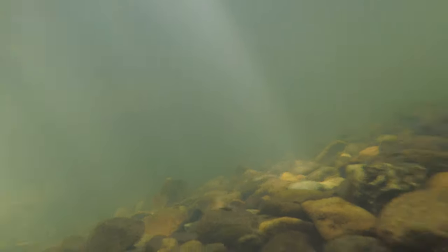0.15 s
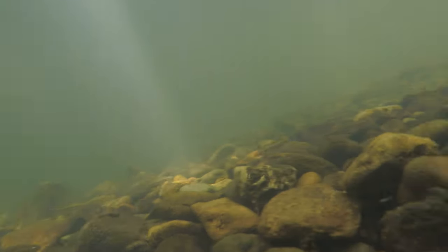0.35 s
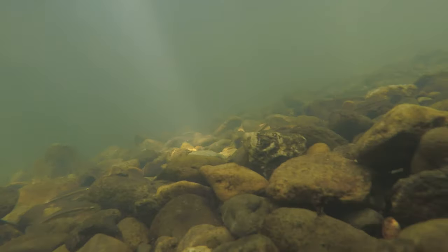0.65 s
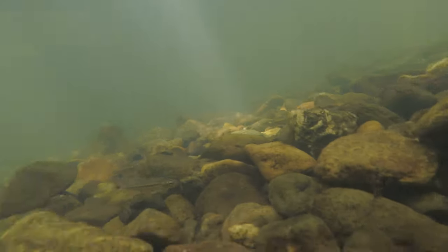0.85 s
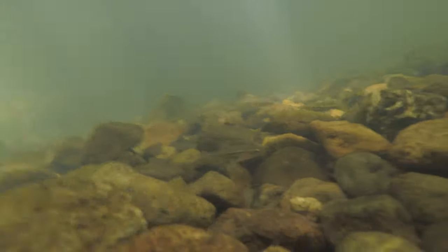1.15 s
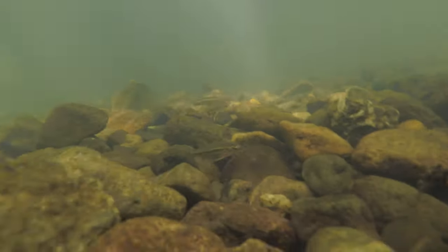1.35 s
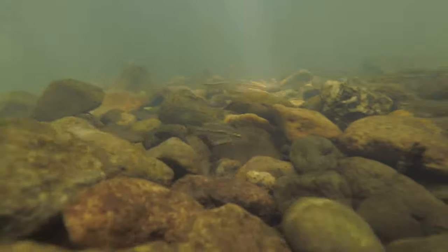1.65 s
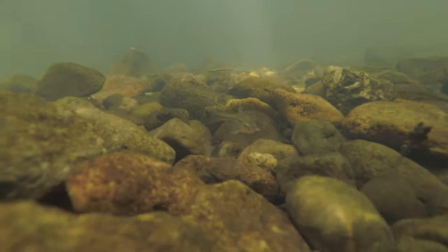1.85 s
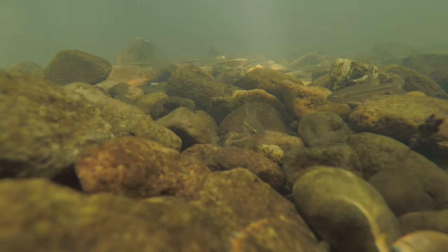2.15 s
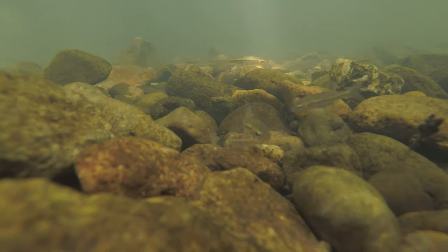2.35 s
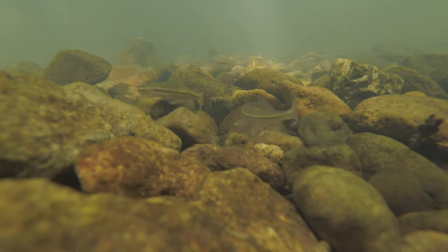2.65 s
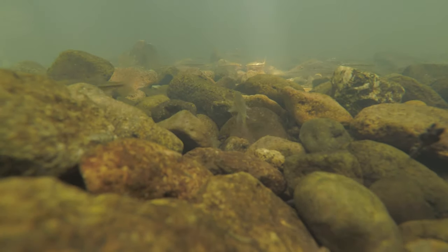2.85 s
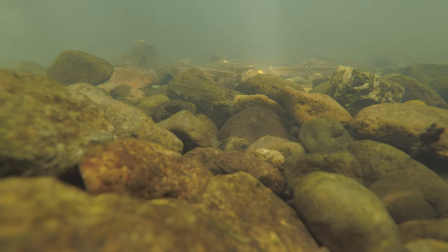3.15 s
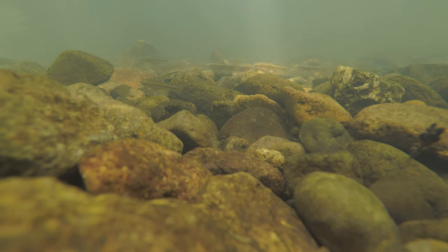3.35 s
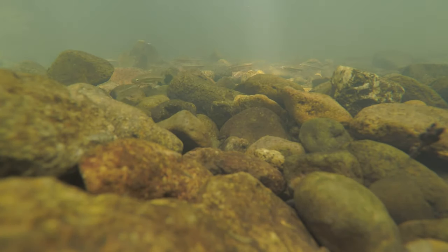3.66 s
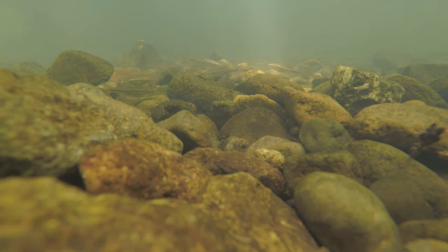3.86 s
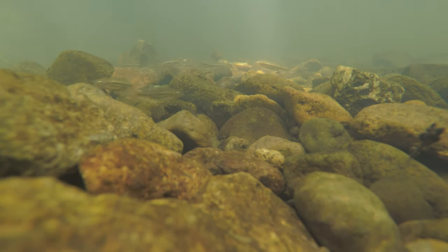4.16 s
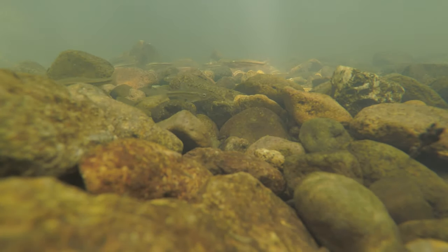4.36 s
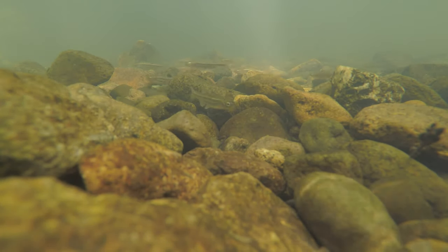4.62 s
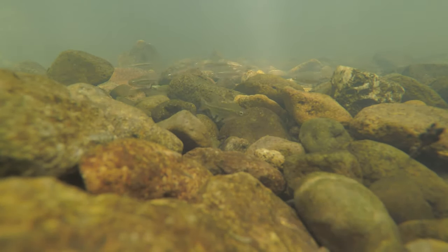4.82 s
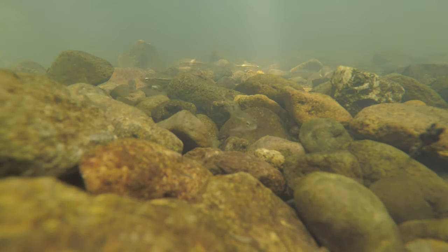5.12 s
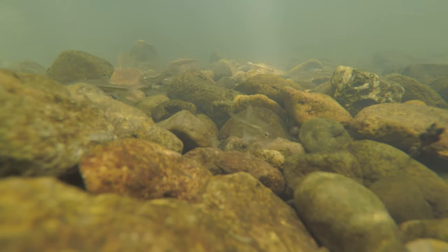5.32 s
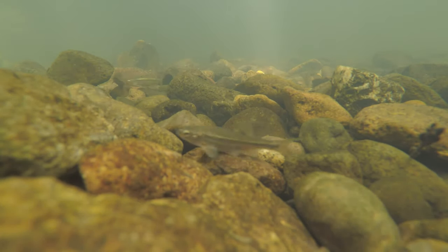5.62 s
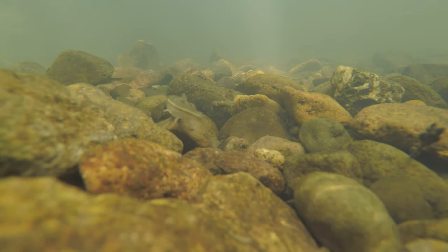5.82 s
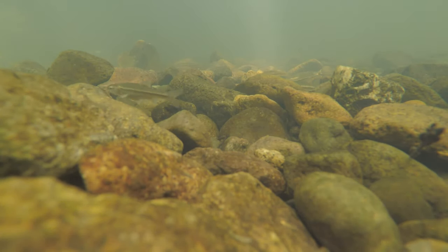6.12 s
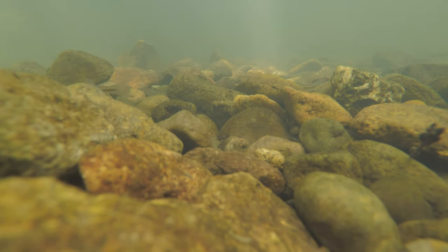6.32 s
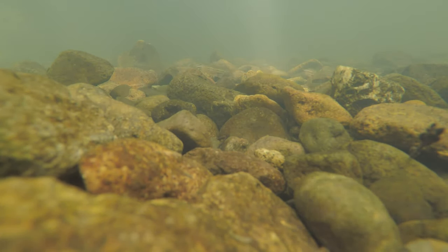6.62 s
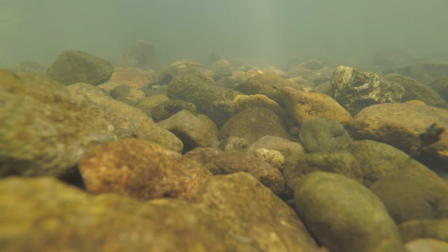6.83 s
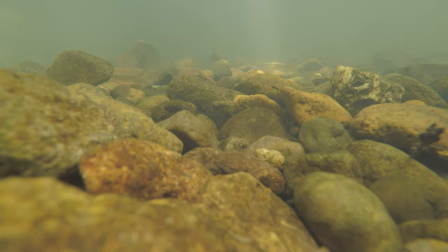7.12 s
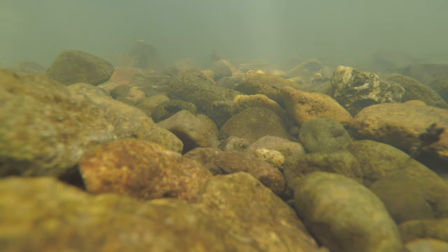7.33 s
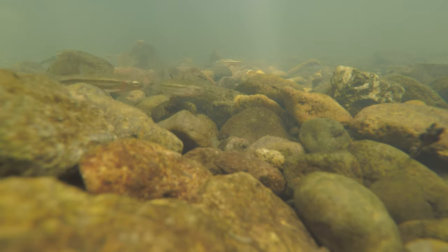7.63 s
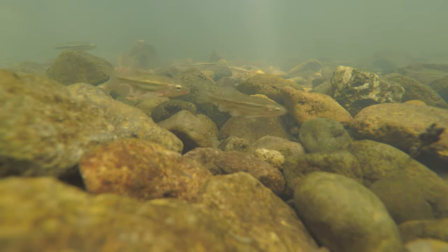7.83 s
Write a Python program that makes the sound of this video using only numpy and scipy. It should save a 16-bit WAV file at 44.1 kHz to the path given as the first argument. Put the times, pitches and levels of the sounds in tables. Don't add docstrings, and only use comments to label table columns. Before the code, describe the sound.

Hollow plastic knocks and gritty scrapes on creek stones, a brief hush, then dull rumbling water flow with small bubble ticks and plinks.

```python
import sys
import numpy as np
from scipy import signal
from scipy.fft import rfft, irfft, next_fast_len
from scipy.io import wavfile
from scipy.ndimage import uniform_filter1d

SR = 44100
rng = np.random.default_rng(int(sys.argv[2]) if len(sys.argv) > 2 else 0)


def volts(x):
    e = np.asarray(x, float) / 20
    return 10 ** e


def log_audio(samples):
    frames = np.atleast_2d(samples).T
    limited = np.clip(frames, -1, 1)
    pcm = np.round(limited * 32767).astype(np.int16)
    wavfile.write(sys.argv[1], SR, pcm)


N = 351918

# f/Hz, width/Hz, level/dB
HOUSING_MODES = [(1230, 310, 2.5), (1630, 420, 0), (2310, 270, -10), (3430, 470, -25), (4970, 330, -38)]
# t/s, level/dB
GAIN_NOISE = [
    (0, -93.5),
    (2.15, -99.5),
    (2.9, -84.5),
    (3.4, -80.5),
    (3.9, -77),
    (4.9, -74),
    (5.6, -75.5),
    (7.98, -72),
]


def rms_one(x):
    return x / np.sqrt(np.mean(x ** 2) + 1e-20)


def in_time(rows):
    s, *columns = np.transpose(rows)
    return [np.interp(np.arange(N) / SR, s, c) for c in columns]


def drift(rate):
    r = np.exp(-80 * np.pi * rate / SR)
    slow = signal.lfilter([1], [1, -2 * r, r * r], rng.standard_normal(N // 40 + 2002))[2000:]
    return np.interp(np.arange(N) / 40, np.arange(len(slow)), rms_one(slow))


def colour(x, hz, level_db, lead_rad=None):
    size = next_fast_len(N + 4096) * 2
    grid = np.log(np.fft.rfftfreq(size, 1 / SR) + 1)
    log_hz = np.log(hz)
    shape_db = np.interp(grid, log_hz, level_db)
    if lead_rad is not None:
        turn = np.exp(1j * np.interp(grid, log_hz, lead_rad))
        return irfft(rfft(x, size) * volts(shape_db) * turn, size)[:N]
    shape_db -= 25 * (np.maximum(log_hz[0] - grid, 0) + np.maximum(grid - log_hz[-1], 0))
    cepstrum = irfft(np.log(rms_one(volts(shape_db))), size)
    cepstrum[1:size // 2] *= 2
    cepstrum[size // 2 + 1:] = 0
    return irfft(rfft(x, size) * np.exp(rfft(cepstrum)), size)[:N]


def band(x, low_hz, high_hz):
    return signal.sosfilt(signal.butter(2, [low_hz, high_hz], "band", fs=SR, output="sos"), x)


def low_pass(x, hz):
    return signal.sosfilt(signal.butter(4, hz, fs=SR, output="sos"), x)


def high_pass(x, hz, order):
    return signal.sosfilt(signal.butter(order, hz, "high", fs=SR, output="sos"), x)


def add(out, at_s, piece):
    i = max(round(at_s * SR), 0)
    out[i:i + len(piece)] += piece[:N - i]


def ping(level_db, hz, t60_s, glide, onset):
    t = np.arange(int(SR * .25)) / SR
    envelope = volts(-60 * t / max(t60_s, .002)) * (1 - np.exp(-t * hz * onset))
    warped = t + glide * t * np.minimum(t / t60_s, 1)
    return volts(level_db) * envelope * np.sin(2 * np.pi * hz * warped)


def grit(per_s, spread_db, smooth):
    sizes = volts(spread_db * np.minimum(rng.exponential(1, N), 5)) * rng.choice([-1, 1], N)
    born = rng.random(N) < per_s * volts(4.0 * drift(25)) / SR
    return rms_one(rms_one(sizes * born) + smooth * rng.standard_normal(N))


def resonate(forces, modes):
    out = 0
    for k, (x, (hz, width_hz, level_db)) in enumerate(zip(forces, modes)):
        r = np.exp(-np.pi * width_hz / SR)
        rung = signal.lfilter([1 - r * r, 0, r * r - 1], [1, -2 * r * np.cos(2 * np.pi * hz / SR), r * r], x)
        out = out + (-1) ** k * volts(level_db) * rung
    return low_pass(out, 5700)


def knocks():
    # t/s, peak/dB, ring f/Hz, grind/dB, lead-in/share of contact
    lowering = [(0.155, -24, 720, -51, 0.57), (.182, -31, 946, -63, .5), (0.201, -22.5, 784, -52.5, .5),
                (.2185, -27.5, 914, -36.5, 0.39), (0.231, -18, 695, -54, 0.91),
                (0.246, -22.5, 888, -66, .2), (0.263, -18.5, 780, -49, .7), (0.302, -18, 793, -42, 0.31),
                (0.328, -14, 750, -44.5, .6), (0.339, -13.5, 726, -33.5, 0.36),
                (.36, -23.5, 720, -63, 0.41), (.391, -12, 605, -36.5, 0.27), (0.403, -11.5, 559, -45, 1),
                (0.464, -14.5, 825, -28.5, 0.55), (.483, -10.5, 768, -30, 0.43),
                (0.491, -12.5, 744, -20, 0.53), (0.527, -16, 620, -34.5, 0.66),
                (0.561, -24.5, 653, -68, 0.32), (0.619, -38, 580, -62, 0.64), (0.693, -26, 688, -55.5, 1),
                (0.751, -28, 750, -68, 0.52), (0.786, -33, 720, -59, 0.4)]
    # t/s, peak/dB, ring f/Hz, grind/dB, lead-in/share of contact
    seating = [(0.97, -18, 1235, -44.5, 0.28), (0.977, -14, 860, -39.5, 0.4), (.998, -11.5, 683, -62, 1),
               (1.142, -18.5, 773, -56, 1), (1.164, -26, 780, -59, 0.24), (1.187, -23, 777, -58, 0.25),
               (1.242, -11, 536, -49, 1), (1.299, -10, 907, -27, 0.14), (1.329, -9, 698, -25.5, 0.48),
               (1.41, -16, 526, -76, 0.3), (1.472, -15, 687, -78.5, 0.12), (1.537, -10, 774, -45, 0.23),
               (1.556, -25, 868, -46, 0.48), (1.57, -9.5, 1148, -26, 0.62), (1.604, -24.5, 716, -54, .5),
               (1.669, -33, 830, -73, 0.34), (1.715, -26.5, 814, -71.5, 0.62), (1.736, -17, 863, -51, 0.53),
               (1.748, -11, 651, -56, 0.58), (1.787, -29.5, 920, -55.5, 0.48), (1.799, -14.5, 612, -60, .5),
               (1.811, -16.5, 830, -39, 0.37), (1.897, -30.5, 720, -69.5, 1),
               (1.932, -39, 604, -58.5, 0.52), (1.962, -27.5, 1096, -35, 1), (1.97, -14, 807, -37, .1),
               (1.982, -11, 620, -49.5, .1), (2.035, -17.5, 785, -46, 0.11)]
    # t/s, peak/dB, ring f/Hz
    nudges = [(2.12, -47, 840), (2.16, -65.5, 910), (2.29, -47.5, 692), (2.547, -53, 694),
              (2.58, -54, 1010), (2.9, -47, 686), (2.978, -37.5, 920), (2.564, -45.5, 860),
              (2.625, -47.5, 910), (2.725, -41, 644), (2.777, -31.5, 766), (2.85, -12.5, 400),
              (3.006, -29, 462), (3.057, -26.5, 814), (3.068, -20.5, 477), (3.225, -37, 460),
              (3.295, -40, 327), (3.33, -41, 328), (3.376, -33, 310), (3.512, -31, 520),
              (3.611, -28.5, 540), (3.645, -26, 326), (3.767, -30, 557), (3.901, -19, 520),
              (3.928, -28.5, 590), (3.951, -28.5, 895), (3.468, -45, 700), (3.588, -37, 900),
              (3.678, -37, 900), (3.724, -33, 655), (3.862, -30, 330), (7.328, -31, 980), (7.341, -27, 855),
              (4.043, -26, 520), (4.129, -27.5, 760), (4.217, -31.5, 557), (4.343, -34, 626),
              (4.388, -21.5, 567), (4.422, -25, 540), (4.483, -34, 840), (4.54, -22, 570), (4.63, -20, 610),
              (5.034, -24.5, 670), (5.18, -21.5, 780), (5.201, -13, 810), (5.543, -23, 530)]
    nudge_grind_db, grind_per_db, nudge_lead = -63, .8, 0.62
    contact_s, longer_per_db = 0.0074, 0.05
    reference_db = -26.0

    contacts = lowering + seating
    for s, db, hz in nudges:
        contacts = contacts + [(s, db, hz, nudge_grind_db + grind_per_db * (db - reference_db), nudge_lead)]
    body, rasps = np.zeros(N), np.zeros((len(HOUSING_MODES), N))
    favour_db = 1.3 * rng.standard_normal((len(contacts), len(HOUSING_MODES)))
    t = np.arange(-2205, 3969) / SR
    touch = np.arange(len(t)) == 2300
    noises = rng.standard_normal((len(contacts), len(t)))
    for (s, level_db, hz, grind_db, lead), noise, favours in zip(contacts, noises, favour_db):
        after_s = t - .003
        length_s = contact_s * volts(longer_per_db * (level_db - reference_db))
        rise_s = 0.00039 + max(lead, 0) * length_s
        fall_s = length_s * (0.5 + 0.43 * max(lead, 0))
        envelope = np.exp(np.where(after_s < 0, after_s / rise_s, -after_s / fall_s))
        bite = rms_one(noise * envelope) * 0.033 + touch * 0.96
        rung = band(bite, hz * 0.832, hz * 1.148)
        rung = rung + 0.32 * band(bite, 430, 830) - 0.18 * band(bite, 640, 1124)
        add(body, s + t[0], volts(level_db) * rung / np.abs(rung).max())
        for rasp, lift_db in zip(rasps, favours):
            add(rasp, s + t[0], volts(grind_db + lift_db + 6.5) * noise[::-1] * envelope ** 1.6)
    return low_pass(body, 1350) + resonate(rasps + 1e-18, HOUSING_MODES)


def thumps():
    # t/s, peak/dB, f/Hz, t60/s
    pushes = [(0.265, -31.5, 128.4, 0.3), (0.495, -8, 137.7, 0.014), (0.53, -24.5, 96, 0.12),
              (0.777, -43, 87, 0.13), (0.978, -32, 124, 0.092), (1.141, -18.5, 275, 0.019),
              (1.249, -14, 109.3, 0.023), (1.312, -15.5, 187.4, 0.023), (1.334, -21.5, 110.4, 0.038),
              (1.409, -28, 133.7, 0.13), (1.481, -25.5, 131, 0.046), (1.57, -20.5, 167.5, 0.046),
              (1.753, -19.5, 114, 0.026), (1.808, -29.5, 107, 0.07), (1.976, -15, 90, 0.067),
              (2.008, -40.5, 70.8, 0.36), (2.032, -27, 117.4, 0.07), (2.852, -10.5, 146, 0.024),
              (2.871, -25.5, 78, .12), (3.07, -17, 83.5, 0.053), (3.091, -35, 50.4, 0.42),
              (3.513, -36, 291, 0.048), (3.899, -30.5, 265, 0.025), (4.046, -33, 262, 0.027),
              (2.251, -68.5, 59.3, 0.35), (2.342, -61.5, 67, 0.15), (2.452, -59.5, 68.2, 0.14),
              (4.537, -34, 108.6, 0.37), (4.721, -25, 100, 0.15), (4.925, -31.5, 95.5, 0.46),
              (5.06, -29.5, 87, 0.18), (5.097, -28, 83, 0.22), (5.235, -27, 70.6, 0.13),
              (3.229, -44, 172, 0.032), (3.386, -48, 199, 0.042), (3.747, -42, 127, 0.1),
              (4.39, -37, 196, 0.034), (7.0, -34, 73, 0.15), (7.261, -41, 70, 0.078),
              (4.601, -42, 70, 0.26), (5.541, -26, 106.6, 0.13)]
    out = np.zeros(N)
    for s, level_db, hz, t60_s in pushes:
        add(out, s + 0.0033, ping(level_db + 9.0, hz * 1.117, t60_s, -0.18, onset=16.0))
    return out


def squeaks():
    # t/s, peak/dB, f/Hz, swell/s, fade/s
    slips = [(.208, -25, 850, .005, .006), (.33, -18, 740, .004, .004), (.346, -19, 760, .003, .006),
             (.409, -15, 590, .01, .004), (.452, -40, 1700, .015, .01), (.466, -19, 920, .003, .005),
             (.51, -45, 2350, .006, .008), (.535, -43, 1950, .005, .012), (1.285, -36, 1350, .008, .008),
             (1.301, -19, 1150, .011, .004), (1.346, -30, 1110, .005, .008), (1.472, -30, 1060, .007, .003),
             (1.538, -21, 1090, .009, .003), (1.562, -38, 2350, .005, .006), (1.569, -15, 1100, .007, .006),
             (1.715, -55, 1950, .015, .015), (1.739, -19, 930, .003, .004), (1.79, -52, 1900, .006, .01),
             (1.815, -19, 850, .003, .005), (1.968, -39, 2450, .008, .004), (2.04, -12, 860, .001, .004),
             (2.1, -52, 1230, .01, .009), (2.782, -48, 1400, .01, .01), (2.835, -62, 3600, .012, .012)]
    sag_hz, wobble_hz, rough_above_hz = 40, 25, 1300
    out, t = np.zeros(N), np.arange(-3528, 3528) / SR
    chance = rms_one(low_pass(rng.standard_normal((len(slips), 2, len(t))), 150))
    for (s, level_db, hz, swell_s, fade_s), (wobble, flutter) in zip(slips, chance):
        rise_s, fall_s = np.clip(swell_s, 5e-4, .016), np.clip(fade_s, 1e-3, .016)
        envelope = uniform_filter1d(np.exp(np.where(t < 0, t / rise_s, -t / fall_s)), size=60)
        envelope = envelope * (flutter if hz > rough_above_hz else 1 + .5 * flutter)
        pitch_hz = hz + wobble_hz * wobble - sag_hz * np.tanh(t / .005)
        add(out, s + t[0], volts(level_db) * envelope * np.sin(2 * np.pi * np.cumsum(pitch_hz) / SR))
    return out


def strokes(rows, rise_db_per_s, fall_db_per_s):
    t = np.arange(0, N / SR + .002, .001)
    s, hold_s, *levels_db = np.transpose(rows)[:, :, None]
    before_s = np.maximum(s - t, 0)
    after_s = np.maximum(t - s - np.abs(hold_s), 0)
    loss_db = rise_db_per_s * before_s + fall_db_per_s * after_s
    powers = [np.sum(volts(2 * (level_db - loss_db)), axis=0) for level_db in levels_db]
    return np.array([np.interp(np.arange(N) / SR, t, power) for power in powers])


def motion():
    # t/s, hold/s, rub/dB, brightness/dB, water stirred/dB
    scrapes = [(.24, 0.18, -29.5, -53.5, -36), (.45, 0.063, -22.5, -45, -40.5),
               (.525, 0.0029, -63, -67, -30), (.99, 0.023, -40, -92, -47.5),
               (1.15, 0.044, -36.5, -71, -34.5), (1.285, 0.039, -28, -59.5, -31.5),
               (1.545, 0.037, -31, -50, -31.5), (1.6, 0.037, -42.5, -63, -39),
               (1.705, 0.04, -39.5, -62.5, -41.5), (1.785, 0.028, -35, -55, -35),
               (1.885, .03, -44.5, -70.5, -57), (1.92, 0.017, -44, -74.5, -45),
               (1.95, 0.084, -34.5, -57, -37.5), (2.772, 0.026, -42, -46, -39.5),
               (2.83, 0.048, -37.5, -51.5, -44), (3.052, 0.012, -42, -48, -42),
               (4.38, 0.0082, -39, -75, -38), (4.725, 0.13, -29, -66, -23.5),
               (5.215, 0.029, -26, -43.5, -27.5), (5.27, 0.29, -25, -47, -33), (7.335, 0.02, -39, -58, -69)]
    # t/s, hold/s, rub/dB, brightness/dB, water stirred/dB
    surges = [
        (3.63, 0.15, -43, -59.5, -49.5),
        (4.62, 0.077, -32.5, -71, -40),
        (5.9, 0.18, -32, -48, -41.5),
        (6.1, 0.11, -27, -79, -41.5),
        (6.4, 0.054, -48, -56, -69),
        (6.55, 0.029, -38, -49, -80),
        (6.8, 0.046, -34.5, -42.5, -58),
        (6.93, 0.12, -31.5, -46.5, -54),
        (7.65, .08, -35, -42, -71),
        (7.82, .2, -36.5, -48, -66),
    ]
    # t/s, grit pressure/dB, water swing/dB
    current = [(.05, -40.5, -39.5), (.53, -38.5, -28), (.6, -55.5, -48.5), (.8, -56.5, -44.5),
               (.94, -71, -63), (1.3, -71.5, -38), (1.9, -57, -52.5), (2.12, -78, -54.5), (2.4, -88, -60),
               (2.68, -72.5, -37.5), (3.15, -64, -40.5), (3.46, -55.5, -43), (3.8, -51, -38),
               (4.3, -48.5, -44.5), (4.9, -38, -29.5), (5.14, -49, -40), (5.62, -35.5, -32.5),
               (6.9, -46.5, -42.5), (7.29, -48.5, -49), (7.98, -40.5, -49)]
    scrape_rise_db_per_s, scrape_fall_db_per_s = 601.5, 548
    surge_rise_db_per_s, surge_fall_db_per_s = 145, 149
    swing_over_stir_db, swing_slower = 0, 0.99

    grit_db, swing_db = in_time(current)
    bright_db = in_time(GAIN_NOISE)[0] + 2 + 0.5168 * (grit_db + 58.5)
    gurgle_db = -61.5 + 1.53 * (grit_db + 49.5)
    steady_db = np.array([grit_db, bright_db, gurgle_db])
    moving = strokes(scrapes, scrape_rise_db_per_s, scrape_fall_db_per_s)
    moving = moving + strokes(surges, surge_rise_db_per_s, surge_fall_db_per_s)
    swung = strokes(scrapes, scrape_rise_db_per_s, swing_slower * scrape_fall_db_per_s)[2]
    slosh_db = 10 * np.log10(volts(2 * swing_db) + swung * volts(2 * swing_over_stir_db))
    return (*10 * np.log10(volts(2 * steady_db) + moving), slosh_db)


def rub(rub_db, bright_db, share):
    # f/Hz, level/dB per Hz
    shell = [(250, -12), (420, -5), (560, 8.5), (680, 3.5), (780, -3.5), (910, 5), (1100, -13.5),
             (1250, -17.5), (1600, -25)]
    # f/Hz, left/dB, right/dB, left lead/rad
    ports = [(290, -15, -17, -.6), (410, -22, -11, -3.2), (530, -9, -6, -5.3), (600, -11, -6, -5),
             (700, -3, -2, -3.8), (830, 5, -4, -3.7), (970, -6, -20, -2), (1150, -6, -19, 1.8),
             (1350, -7, -12, 3.5), (1600, -19, -15, 4.1), (1900, -22, -17, 3.6), (2350, -25, -27, 3.6),
             (2700, -39, -41, 5.2),
             (3200, -44, -46, 5.6), (3700, -38, -35, 6.6), (4400, -51, -48, 6.6), (5200, -51, -50, 6.3),
                 (6000, -46, -42, 5.5), (6900, -53, -51, 5.8), (7800, -55, -45, 9), (10000, -58, -55, 9)]
    settled_s = 5.13

    settled = np.clip((np.arange(N) / SR - settled_s) * 20, 0, 1)
    lumps_db = 1.0 * settled + 2.9 * (1 - settled)
    force = grit(1500, 3.3, smooth=0.78 + .5 * settled) * volts(lumps_db * drift(21))

    hz, left_db, right_db, lead_rad = np.transpose(ports)
    loose = 0.28 * rng.standard_normal((2, N))
    left = colour(force + loose[0], hz, left_db)
    right = colour(colour(force + loose[1], hz, left_db), hz, right_db - left_db, -lead_rad)
    pair = share * volts(6) * np.array([left, right])
    pair_low, pair_top = low_pass(pair, 1450), high_pass(pair, 1450, 4)

    single_low = low_pass(colour(force, *np.transpose(shell)), 1400)
    single_top = rms_one(resonate([force] * 4, HOUSING_MODES[1:]))

    high_hum = volts(-29.5) * rms_one(band(band(force, 1500, 2130), 1500, 1900))
    low_hum = volts(-18.5) * rms_one(band(force, 1106, 1233))
    hum = settled * (high_hum + low_hum)
    lower = (1 - share) * single_low + (1 - share ** 2) * hum + pair_low
    upper = (1 - share) * volts(-10.5) * single_top + volts(13.0) * pair_top
    return lower * volts(rub_db) + upper * volts(bright_db)


def slosh(slosh_db, gurgle_db, rub_db, share):
    # f/Hz, level/dB per Hz
    swing = [(12, -38), (20, 0.5), (81, 0.5), (124, -2.5), (167, -12.5), (200, -15.5), (260, -48),
             (440, -120)]
    steep = signal.butter(3, [30, 220], "band", fs=SR, output="sos")
    mid, side = (signal.sosfilt(steep, colour(rng.standard_normal(N), *np.transpose(swing))) for _ in "ms")
    slosh_db = slosh_db + 0.24 * (1 - share) * np.minimum(rub_db + 45, 0)
    low = (mid + .08 * share * side * [[1], [-1]]) * volts(slosh_db - 0.5 + 2.5 * drift(14))
    gurgle = rms_one(band(band(grit(500, 2.8, smooth=0.46), 100, 390), 200, 403))
    return low + gurgle * volts(gurgle_db + 2.0 * drift(3.3))


def snaps():
    # t/s, peak/dB
    sharp_clicks = [(0.0544, -62), (0.086, -69), (.1871, -58), (0.2213, -57.5), (.254, -60.5), (0.3536, -47.5),
                    (0.489, -54.5), (0.5196, -57), (1.0218, -55.5), (1.543, -52.5), (2.01, -58), (0.4207, -52.5),
                    (0.544, -64.5), (0.755, -57.5), (1.009, -52), (1.1874, -55), (1.254, -50.5), (1.322, -48.5),
                    (1.4892, -57), (1.572, -54.5), (1.7554, -47.5), (1.823, -53), (2.044, -63), (3.0578, -42.5),
                    (5.778, -46), (4.887, -49.5)]
    clicks = np.zeros((2, N))
    for (s, level_db), uneven in zip(sharp_clicks, rng.standard_normal((len(sharp_clicks), 2))):
        clicks[:, round(s * SR)] = volts(level_db + 18.5 + 1.5 * uneven)
    return signal.lfilter([.3], [1, -.7], band(clicks, 2200, 16000))


def bubbles():
    # t/s, peak/dB, f/Hz
    ticks = [(4.0674, -55, 3430), (4.54, -48, 7150), (4.8868, -52, 3460), (5.105, -51, 3650),
             (5.413, -51, 3450), (5.449, -48, 4150), (5.469, -53, 3900), (5.547, -45, 2580),
             (5.7778, -43, 2100), (5.785, -48, 3700), (5.823, -47, 3530), (6.228, -45.5, 4000),
             (6.3, -54, 3700), (6.332, -55, 2380), (6.342, -49, 3800), (6.41, -47, 6470),
             (6.437, -44, 4200), (6.441, -49, 7240), (6.448, -43, 4150), (6.451, -44, 3500),
             (6.455, -45, 2600), (6.463, -44, 3660), (6.488, -34.5, 4060), (6.5007, -40.5, 7470),
             (6.546, -46, 2620), (6.558, -53, 6800), (6.567, -52, 3170), (6.615, -47, 6300),
             (6.654, -50, 2620), (6.66, -53, 4700), (6.682, -47, 3800), (7.305, -58, 4800),
             (7.365, -50, 4950), (7.457, -48, 3550), (7.472, -49, 5300), (7.473, -49, 6200),
             (7.5157, -47, 4700), (7.535, -44, 5900), (7.547, -45, 3700), (7.548, -50, 6250),
             (7.5568, -46, 7040), (7.615, -47, 5900), (7.777, -52, 6300)]
    # t/s, peak/dB, f/Hz, t60/s
    plinks = [(0.61, -78, 1970, 0.83), (0.699, -17.5, 1110, 0.024), (0.955, -51.5, 1880, 0.064),
              (2.697, -48, 1230, 0.065), (2.699, -35.5, 480, 0.044), (5.31, -34.5, 2150, 0.029),
              (6.408, -26.5, 1400, 0.026), (6.479, -36, 1646, 0.067), (7.478, -40, 2020, 0.023),
              (7.485, -33, 1590, 0.03), (7.548, -26, 2080, 0.024), (7.553, -20.5, 1930, 0.019),
              (7.56, -40, 2280, 0.038), (7.6, -33, 1660, 0.044)]
    out = np.zeros(N)
    for s, level_db, hz in ticks:
        add(out, s, ping(level_db - 3.0, hz, 63.0 / hz, 0.036, onset=6.2))
    for s, level_db, hz, t60_s in plinks:
        add(out, s - .002, ping(level_db + 0.5, hz, t60_s, -0.042, onset=0.2))
    for when, pitch, size in rng.random((70, 3)):
        hz = 1200 * 5.0 ** pitch
        level_db = -47 - 9.0 * pitch - 11 * size
        add(out, 5.9 + 2.05 * when, ping(level_db, hz, 80.0 / hz, 0.022, onset=.6))
    return out


def trickle():
    hum = rms_one(band(band(grit(400, 1.8, smooth=.6), 720, 1020), 720, 1020))
    return hum * volts(in_time(GAIN_NOISE)[0] + 14.5 + 3.0 * drift(44))


def hiss(bright_db, share):
    # f/Hz, level/dB per Hz
    spectrum = [(1700, -7.5), (2900, -17.5), (5100, -22.5), (7800, -23.5), (9800, -22.5), (11500, -30),
                (15400, -36.5)]
    mid, side = (colour(rng.standard_normal(N), *np.transpose(spectrum)) for _ in "ms")
    surge_db = 0.052 * (bright_db + 65) + 0.9 * drift(14)
    side = share * 0.92 * side + (1 - share) * high_pass(side, 12500, 2)
    return volts(in_time(GAIN_NOISE)[0] + 10.0 + surge_db) * (mid + side * [[1], [-1]])


def scene():
    # t/s, share/0-1
    pair_share = [
        (0, 0.32),
        (.3, 0.1),
        (.75, 0.01),
        (5.33, 0),
        (5.8, 0.9),
        (8, 0.88),
    ]
    share = np.clip(in_time(pair_share)[0], 0, 1)
    rub_db, bright_db, gurgle_db, slosh_db = motion()
    centre = knocks() + squeaks() + thumps() + slosh(slosh_db, gurgle_db, rub_db, share)
    sided = bubbles() * volts(share * np.array([[-2.5], [2.5]]))
    return centre + trickle() + snaps() + sided + rub(rub_db, bright_db, share) + hiss(bright_db, share)


def band_limit(x):
    return signal.sosfilt(signal.butter(12, 15710, fs=SR, output="sos"), x)


def record(dry):
    limited = dry / (1 + np.abs(dry / .41) ** 6) ** (1 / 6)
    cut = signal.sosfilt(signal.cheby2(10, 30, 16100, fs=SR, output="sos"), limited)
    return band_limit(cut)


dry = scene()
out = record(dry)
log_audio(out)
```